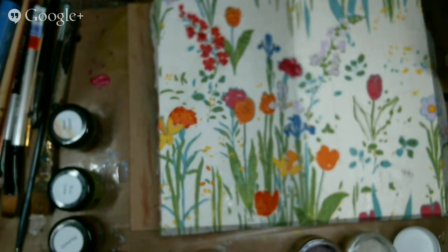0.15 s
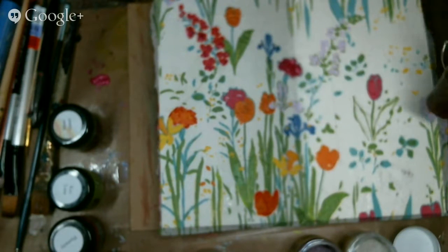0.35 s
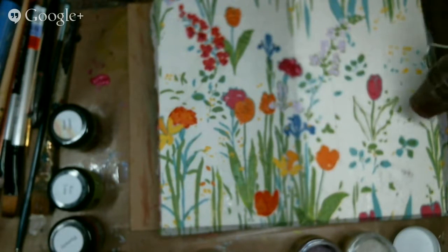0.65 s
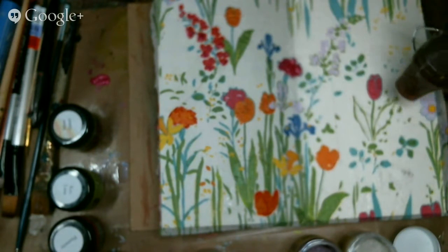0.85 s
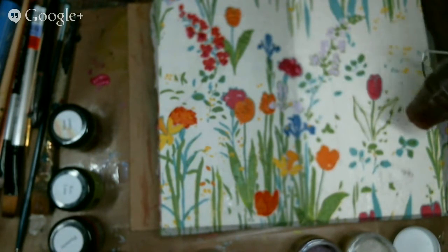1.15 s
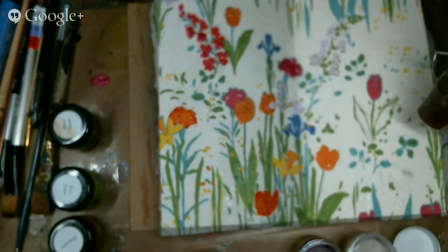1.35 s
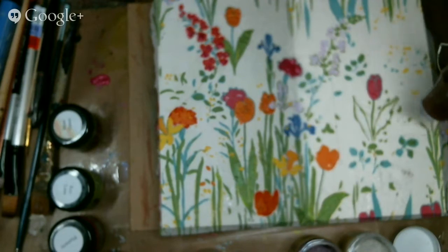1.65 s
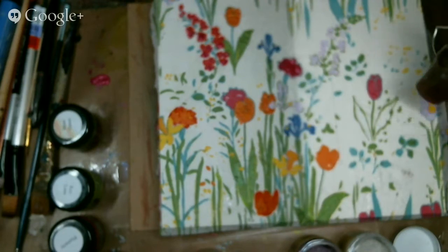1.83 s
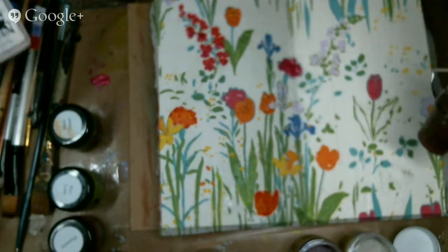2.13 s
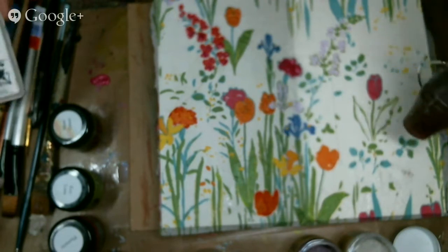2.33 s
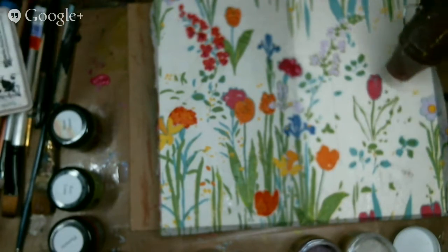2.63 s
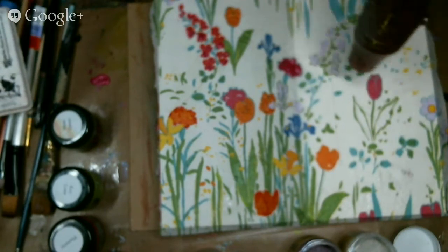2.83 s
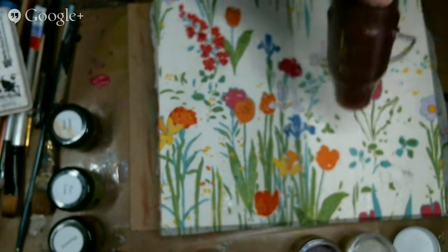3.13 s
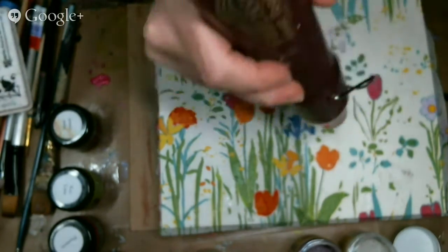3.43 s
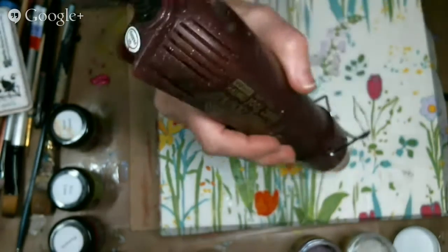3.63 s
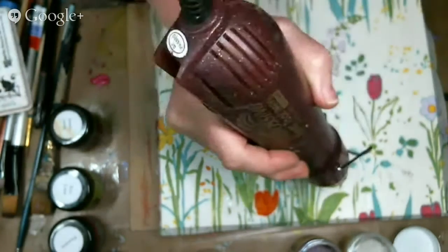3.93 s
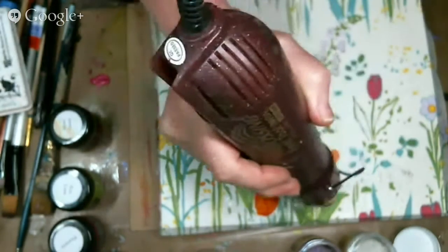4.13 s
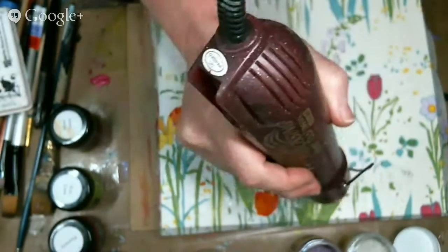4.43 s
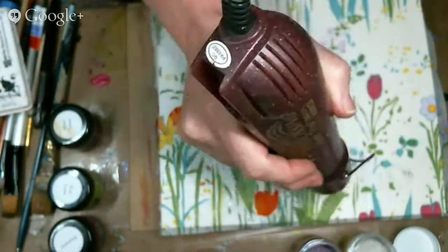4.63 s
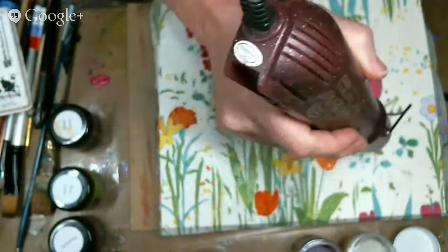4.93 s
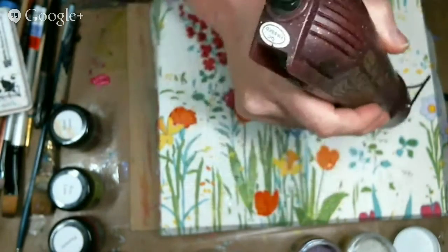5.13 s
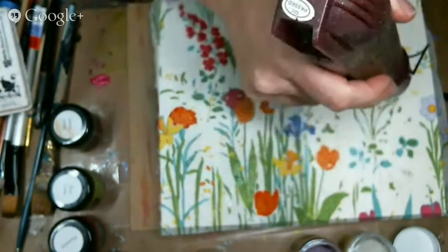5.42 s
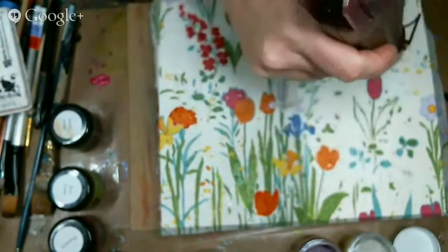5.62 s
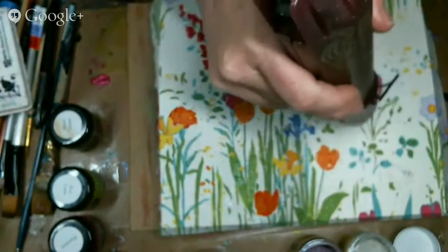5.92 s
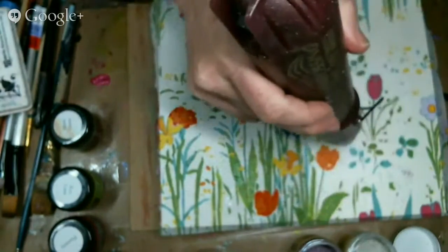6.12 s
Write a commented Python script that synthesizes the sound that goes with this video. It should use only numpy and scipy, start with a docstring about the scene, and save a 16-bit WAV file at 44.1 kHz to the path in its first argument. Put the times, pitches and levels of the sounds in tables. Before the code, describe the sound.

Electric blower motor starts with a rushing whine, drops away in steps, bubbles faintly, then one hard plastic clack on a desk.

```python
"""At a desk, near a webcam, a handheld hot-air tool starts up and is turned.
The motor is a stack of sines at shaft orders 6 to 26 plus a blade tone at order 5; the air is shaped noise.
After a second the rush sinks band by band; low blips, short soft-edged sines, bubble through what is left.
A plastic box is set down with one knock: several close contacts, each of decaying modes and noise bursts."""
import sys
import numpy as np
from scipy import signal
from scipy.fft import rfft, irfft, next_fast_len
from scipy.io import wavfile
from scipy.ndimage import uniform_filter1d, map_coordinates

SR = 44100
rng = np.random.default_rng(int(sys.argv[2]) if len(sys.argv) > 2 else 0)


def output_pcm(signal):
    """Save a mono or channel-first signal as 16-bit PCM at the path in sys.argv[1].

    Samples are clipped to [-1, 1] before scaling.
    """
    pcm = np.clip(np.atleast_2d(signal).T, -1, 1) * 32767
    wavfile.write(sys.argv[1], SR, np.round(pcm).astype(np.int16))


N = 276507

# mean level of the five-blade fan tone, before flares: (time [s], rms level [dB])
BLADE_LEVELS = [(.06, -54), (.13, -48.5), (.22, -41.5), (.5, -41), (.94, -38.5), (1.01, -47.5), (1.4, -51),
                (1.55, -57), (2.14, -67.5), (2.2, -53.5), (2.45, -59.5), (3.5, -57), (3.62, -44),
                (3.76, -31), (3.86, -43.5), (4.1, -50.5), (4.7, -53), (5.6, -51), (6.27, -50.5)]
# brief flares of the blade tone: (time [s], rise [dB], half-length to 1/e [s])
BLADE_FLARES = [(0.352, 7.5, 0.051), (2.906, 20, 0.0234), (2.986, 17.5, 0.0112), (3.058, 22, 0.0075),
                (3.668, 5, 0.029), (3.913, 6, 0.0317), (3.993, 13.5, 0.0107), (4.438, 8, 0.0236),
                (5.916, 3, .08)]
# turn of the air inlet towards the microphone: (time [s], share [0-1])
TURN_SHARES = [(2.7, 0), (3.3, 0.77), (3.7, 1)]
# relative colour of the air, tool seen from the side: (frequency [Hz], density [dB])
SIDE_COLOUR = [(40, -13.5), (85, -24.5), (150, -28.5), (500, -17), (750, -3), (1000, -9), (1600, -6.5),
               (2600, -10.5), (3300, -7.5), (3700, -2.5), (4000, 4), (4400, -8.5), (6100, -17), (7000, -28),
               (8100, -60.5)]
# relative colour of the air, tool seen from behind: (frequency [Hz], density [dB])
END_COLOUR = [(40, -9.5), (85, -26), (150, -18), (480, -28), (680, -12), (950, -13), (1400, -5.5),
              (1800, 0), (2250, -5), (2550, 4.5), (3000, -8.5), (4600, -7), (5500, -10.5), (6800, -17),
              (8000, -45)]
# air resonances of the housing: (frequency [Hz], width [Hz], height above the colour [dB])
HOUSING_MODES = [(277, 84, 9), (478.3, 50, 15.5), (658.6, 34.65, 17.5), (756.8, 61.3, 11)]
# shaft orders from 6 up, mean level over the rush per Hz: (side on [dB], from behind [dB])
ORDER_LEVELS = [(13, 12), (17, 13), (19, 22), (13, 18), (23, 24), (15, 18), (17, 21), (17, 24), (15, 16),
                (17, 19), (22, 18), (25, 28), (24, 15), (15, 21), (24, 25), (25, 31), (20, 23), (22, 23),
                (23, 14), (22, 22), (20, 18)]
# single orders sing out or fall away: (order [-], time [s], change [dB], half-length to 1/e [s])
ORDER_CHANGES = [(7, 3.1, 10, .45), (11, 2.9, 6, .7), (18, 2.8, 4, .2), (25, 3.1, 4, .4), (26, 2.8, 5, .5),
                 (8, 6.05, 12, .55), (17, 5.3, -3, .5), (13, 6.1, 5, .4), (21, .4, 5, .25),
                 (16, .45, 5, .25), (17, 4.5, 3, .4), (8, .4, 4, .3), (21, 1.5, -4, .4), (23, 1.4, -8, .4),
                 (25, 1.4, -8, .4), (17, 3.1, -9, .6), (10, 3.1, -5, .6), (20, .8, -7, .5)]
# shortfall of shaft speed at switch-on: (shortfall [turns/s], time constant [s])
SPIN_UP_GAPS = [(159.9, .109), (28.3, .365)]
# parts of the rush: name: (lower edge [Hz], upper edge [Hz])
RUSH_BANDS = {"rumble": (20, 150), "hollow": (200, 560), "duct": (600, 900), "rush": (1450, 2700),
              "edge": (2800, 3400), "nozzle": (3500, 4400), "hiss": (4400, 5900), "top": (6100, 7500)}
# course of each part: name: (full level [dB], missing at switch-on [dB], rise time constant [s],
# change with the turn [dB], sinking [dB/s], share of the swells [-])
RUSH_PARTS = {"rumble": (-54.5, 17, .18, -3, 3, 1.1), "hollow": (-41.5, 20.5, 0.1785, -2, 2.5, 1.54),
              "duct": (-34, 16.5, 0.067, -0.5, 2.32, 1.2077), "rush": (-39, 15, 0.0019, 1, .5, 0.806),
              "edge": (-51.5, 16, .08, -1, 0.91, 0.79), "nozzle": (-46, 20, .08, -4, 0.68, 0.66),
              "hiss": (-33.5, 15, 0.1658, 2, 0.4251, 0.97), "top": (-41.5, 12, 0.43, 2, 1.39, 0.95)}
# lasting steps in a part: (start [s], part [name], change [dB], duration [s])
RUSH_STEPS = [(.05, "edge", 14, .03), (.05, "nozzle", 10, .03), (5.6, "duct", 4, .5),
              (0.188, "nozzle", 6, 0.12), (.04, "rush", 5, 0.069), (3.6, "duct", -2.5, .05),
              (5.8, "rumble", 5.5, .3), (0.946, "rush", -7.5, 0.024), (0.962, "edge", -11, 0.025),
              (1.017, "edge", 7, 0.084), (0.93, "nozzle", -3, .04), (0.969, "hollow", -8.5, 0.38),
              (0.966, "duct", -16.5, 0.598), (1.17, "rush", -6.5, .015), (1.17, "nozzle", -12, .015),
              (1.17, "hiss", -7, .015), (1.203, "rumble", -12.5, .3), (1.265, "hiss", -10.5, .02),
              (1.375, "rush", -5.5, 0.072), (1.393, "edge", -12.5, 0.0727), (1.36, "nozzle", -4.5, 0.047),
              (1.383, "hiss", -3.5, 0.074), (1.5, "hollow", -13, 0.78), (2.5, "rush", 4.5, 0.039),
              (0.966, "top", -9.5, 0.12), (1.17, "top", -6, .015), (1.274, "top", -7.5, 0.1)]
# swells of the whole rush, before each part's share: (peak time [s], rise [dB], attack [s], decay [s])
RUSH_SWELLS = [(1.16, 3, .03, .012), (2.482, 5, 0.0188, 0.24), (3.772, 5, 0.069, 0.578)]
# contacts of box and desk: (time [s], nominal level, 2 dB taken off when struck [dB])
CONTACTS = [(2.4517, -4), (2.4622, -15), (2.467, -16.5), (2.477, -21), (2.506, -30.5), (2.615, -30)]
# modes of the box: (frequency [Hz], mean level [dB], t60 [s])
BOX_MODES = [(788, -16, 0.059), (973.3, -1, 0.045), (1116.6, -5.5, 0.042), (1179, -1, 0.033),
             (2200, -8, 0.028), (2603, -10.5, 0.0354), (3130, -22.5, 0.02)]
# loudest low blips: (time, 8 ms after onset [s], nominal peak, 1 dB added when sounded [dB], pitch [Hz])
LOUD_BLIPS = [(1.307, -37.5, 488.3), (1.381, -33, 484.2), (1.474, -37.5, 715), (1.481, -41, 515.4),
              (1.617, -46, 287.3), (1.635, -36.5, 495), (1.687, -35.5, 516.6), (1.713, -40, 712.7),
              (1.805, -42.5, 527), (1.891, -44.5, 509.5), (1.961, -49, 278.4), (2.062, -43.5, 671.7),
              (2.145, -34.5, 485.6), (2.164, -42, 695.7), (2.344, -43, 463.7), (2.477, -35.5, 474.3),
              (2.563, -47, 257.4), (2.62, -46.5, 261.2), (2.696, -36, 485.5), (2.757, -42, 688.6),
              (2.956, -37, 652.6), (3.046, -36, 661), (3.579, -43, 276), (3.774, -42, 298),
              (4.164, -45, 478), (4.172, -37, 661.7), (4.337, -41.5, 675), (4.402, -48.5, 263.7),
              (4.881, -48, 277), (4.957, -40.5, 741.4), (5.512, -52, 648), (4.982, -51.5, 501),
              (5.51, -53.5, 474), (3.729, -49, 717.3), (5.437, -50, 685), (4.621, -54, 263.5),
              (4.682, -50.5, 474.3), (5.92, -55, 264.2), (6.142, -56.5, 276), (6.195, -53, 483)]

HOT_TURNS_PER_S, COLD_EXTRA_TURNS_PER_S, WARM_S = 260.62, 25.9, 1.73
# fainter blips by chance, levels nominal as above
FAINT_COUNT, FAINT_FROM_S = 36, 1.3
FAINT_DB, FAINT_SINK_DB_PER_S, FAINT_SCATTER_DB = -49, 1.8, 3
TOP_HZ = 8010


def tool():
    """Sum of air noise, shaft orders, housing throb and blade tone."""
    now_s = np.arange(N) / SR
    air, level_db, hz, frame_s = air_rush()
    # the shaft runs a little unevenly
    phase = 2 * np.pi * np.cumsum(shaft_turns_per_s(now_s)) / SR + 0.025 * wobble(25)
    once_a_turn = 0.15 * np.cos(phase)
    twice_a_mains_cycle = 0.1 * np.cos(2 * np.pi * 120 * now_s)
    air *= 1 + once_a_turn + twice_a_mains_cycle
    whine = shaft_whine(phase, level_db, hz, frame_s, now_s)
    return air + whine + housing_throb(now_s) + blade_tone(phase, now_s)


def shaft_turns_per_s(t):
    """Shaft speed: spins up, then sags as the motor warms."""
    cold = COLD_EXTRA_TURNS_PER_S * np.exp(-t / WARM_S)
    shortfall = sum(gap * np.exp(-t / tau_s) for gap, tau_s in SPIN_UP_GAPS)
    return HOT_TURNS_PER_S + cold - shortfall


def shaft_whine(phase, level_db, hz, frame_s, now_s):
    """Tones at whole multiples of shaft speed, riding on the local rush level."""
    settled_db = np.interp(now_s, [0.12, 0.28], [-14, 0])  # orders emerge as the motor comes up to speed
    late_turn = turned(frame_s) ** 4  # orders change late in the turn
    whine = np.zeros(N)
    for order, (side_db, end_db) in enumerate(ORDER_LEVELS, start=6):
        bins = order * shaft_turns_per_s(frame_s) / hz[1]
        rush = map_coordinates(level_db, [bins, np.arange(len(frame_s))], order=1)
        view_db = side_db + late_turn * (end_db - side_db)
        changes_db = sum(db * bump(frame_s, s, half_s) for k, s, db, half_s in ORDER_CHANGES if k == order)
        order_db = np.interp(now_s, frame_s, rush + view_db + changes_db) + settled_db
        unsteady_db = wobble(4) + 2.5 * wobble(20)
        tone = np.sin(order * phase + rng.uniform(0, 7))
        whine += np.sqrt(2) * amp(order_db + unsteady_db) * tone
    return whine


def blade_tone(phase, now_s):
    """Five blades a turn give order 5; eddies spread a noisy skirt round the tone."""
    blade = 5 * phase
    skirt = 0.2 * (wobble(300) * np.sin(blade) + wobble(300) * np.cos(blade))
    flare_db = sum(db * bump(now_s, s, half_s) for s, db, half_s in BLADE_FLARES)
    level_db = curve(BLADE_LEVELS, now_s) + flare_db + 1.5 * wobble(45)
    return np.sqrt(2) * amp(level_db) * (np.sin(blade) + skirt)


def air_rush():
    """Rushing air: white noise shaped in short frames, with patchy random levels over pitch and time."""
    hz, frame_s, z = signal.stft(rng.standard_normal(N), SR, nperseg=1024, noverlap=768)
    level_db = rush_db(hz, frame_s)
    flicker_depth_db = along([(100, 1.7), (500, 0.92), (800, 1.6), (1200, 2.34), (3000, 1.3)], hz)
    lull_depth_db = along([(100, 2), (560, 3), (900, 2.5), (1300, -0.5)], hz)
    swell_db = 1.138 * patches(z.shape, bins=40, frames=12)  # ties neighbouring pitches together
    lull_db = lull_depth_db[:, None] * patches(z.shape, bins=14, frames=14)  # the bass drops out at times
    flicker_db = flicker_depth_db[:, None] * patches(z.shape, bins=5, frames=6)
    gain = amp(level_db + swell_db + lull_db + flicker_db) * np.sqrt(SR / 2)  # from per-Hz level
    air = signal.istft(z * gain, SR, nperseg=1024, noverlap=768)[1][:N]
    return air, level_db, hz, frame_s


def rush_db(hz, t):
    """Air level per Hz, frequency by time: colour follows the turn, each part is set to its own level."""
    turn = turned(t)
    peaks = sum(db / (1 + (2 * (hz - mode_hz) / width_hz) ** 2) for mode_hz, width_hz, db in HOUSING_MODES)
    side, end = along(SIDE_COLOUR, hz)[:, None], along(END_COLOUR, hz)[:, None]
    colour = (1 - turn) * side + turn * end + peaks[:, None]
    power = [np.sum(amp(2 * colour[(hz >= lo) & (hz < hi)]), 0) * hz[1] for lo, hi in RUSH_BANDS.values()]
    lift_db = np.array([part_db(name, t) for name in RUSH_BANDS]) - 10 * np.log10(power)
    # lift is constant inside a part and glides between parts
    edges_hz = np.ravel(list(RUSH_BANDS.values()))
    place = np.interp(hz, edges_hz, np.arange(2 * len(RUSH_BANDS)) // 2)
    low = np.minimum(place.astype(int), len(RUSH_BANDS) - 2)
    share = (place - low)[:, None]
    return colour + (1 - share) * lift_db[low] + share * lift_db[low + 1]


def part_db(name, t):
    """Level of one part of the rush: rise, steps, turn, slow sinking and swells."""
    full_db, missing_db, rise_s, turn_db, sink_db_per_s, share = RUSH_PARTS[name]
    start_db = -missing_db * np.exp(-t / rise_s)
    steps_db = sum(db * np.clip((t - s) / length_s, 0, 1)
                   for s, part, db, length_s in RUSH_STEPS if part == name)
    swell_db = sum(db * np.where(t < s, bump(t, s, up_s), np.exp(-np.abs(t - s) / down_s))
                   for s, db, up_s, down_s in RUSH_SWELLS)
    sunk_db = sink_db_per_s * np.maximum(t - TURN_SHARES[0][0], 0)  # from the start of the turn
    return full_db + start_db + steps_db + turn_db * turned(t) - sunk_db + share * swell_db


def turned(t):
    """Share of the turn completed."""
    return curve(TURN_SHARES, t)


def housing_throb(now_s):
    """The housing shakes below the pitch of the air: narrow noise following the rumble level."""
    throb = passed(rng.standard_normal(N), 27, 36)
    return amp(part_db("rumble", now_s) - 3) * throb / throb.std()


def box():
    """Each contact rings the box modes at new strengths, with clack, crack and desk thud; a short room tail."""
    out, t = np.zeros(N + SR), np.arange(SR // 4) / SR
    for s, db in CONTACTS:
        ring = sum(decay(level_db + rng.normal(0, 1.5), t60_s, t) * np.sin(2 * np.pi * hz * t)
                   for hz, level_db, t60_s in BOX_MODES)
        clack = decay(-4, 0.0808, t) * passed(rng.standard_normal(len(t)), 2100, 3547)
        crack = decay(-8.5, 0.05, t) * passed(rng.standard_normal(len(t)), 5200, 7300)
        thud = decay(-6, 0.17, t) * passed(rng.standard_normal(len(t)), 70, 560)
        thud *= 1 - np.exp(-t / 0.0214)
        onset = 1 - np.exp(-t / 0.0015)
        out[round(s * SR):][:len(t)] += amp(db - 2) * onset * (ring + clack + crack + thud)
    tail = rng.standard_normal(len(t)) * decay(0, 0.045, t)
    tail /= np.linalg.norm(tail)
    wet = out[:N] + amp(-14) * signal.fftconvolve(out, tail)[:N]
    # the microphone is deaf to the top of the crack
    return passed(passed(wet, 40, 6600), 40, 6600)


def blips():
    """Short sines under a squared-sine envelope, each with a random length and phase bend."""
    out = np.zeros(N + SR)
    for s, db, hz in [*LOUD_BLIPS, *faint_blips()]:
        length_s = 0.03925 * np.exp(rng.normal(0, 0.291))
        t = np.arange(int(length_s * SR)) / SR
        arch = np.sin(np.pi * t / t[-1])
        bend = rng.normal(0, 2) * arch
        out[round((s - 0.008) * SR):][:len(t)] += amp(db + 1) * arch ** 2 * np.sin(2 * np.pi * hz * t + bend)
    return out[:N]


def faint_blips():
    """Chance faint low blips at three set pitches, sinking in level with time."""
    luck_time, luck_pitch, luck_level = rng.random((FAINT_COUNT, 3)).T
    late_s = luck_time * (N / SR - FAINT_FROM_S)
    set_hz = np.array([277, 478.3, 658.6])
    pitch_hz = set_hz[(3 * luck_pitch ** 2).astype(int)]  # mostly the lowest
    level_db = FAINT_DB - FAINT_SINK_DB_PER_S * late_s + FAINT_SCATTER_DB * (2 * luck_level - 1)
    return zip(FAINT_FROM_S + late_s, level_db, pitch_hz)


def amp(db):
    """Gain of a level in dB."""
    return 10 ** (np.asarray(db) / 20)


def decay(start_db, t60_s, t):
    """Exponential decay, 60 dB down after t60_s."""
    return amp(start_db - 60 * t / t60_s)


def along(points, hz):
    """(frequency [Hz], value) points read on a log axis."""
    f, v = np.transpose(points)
    return np.interp(np.log(hz + 1), np.log(f + 1), v)


def curve(points, t):
    """(time [s], value) points read at the times t."""
    s, v = np.transpose(points)
    return np.interp(t, s, v)


def bump(t, s, half_s):
    """Gaussian hump of height 1 at s."""
    return np.exp(-((t - s) / half_s) ** 2)


def wobble(knots_per_s):
    """Smooth random curve through normal knots."""
    knots = rng.standard_normal(int(N * knots_per_s / SR) + 4)
    return map_coordinates(knots, [np.arange(N) * knots_per_s / SR])


def patches(shape, bins, frames):
    """Random field of standard deviation 1, smooth over some bins and frames."""
    field = uniform_filter1d(rng.standard_normal(shape), bins, 0)
    field = uniform_filter1d(field, frames, 1)
    return field / field.std()


def passed(x, lo_hz, hi_hz):
    """Causal Butterworth band-pass."""
    return signal.sosfilt(signal.butter(4, [lo_hz, hi_hz], "band", fs=SR, output="sos"), x)


def scene():
    """One microphone feeds both channels."""
    return np.tile(tool() + blips() + box(), (2, 1))


def record(dry):
    """Cuts the scene off at the band limit and adds a faint converter hiss."""
    m = next_fast_len(N + SR // 4)
    hz = np.fft.rfftfreq(m, 1 / SR)
    hiss_db = along([(8000, -92), (10000, -92), (12000, -88), (14400, -91), (14600, -98), (16000, -103)], hz)
    hiss = rfft(rng.standard_normal(N), m) * amp(hiss_db)
    return irfft(rfft(dry, m) * (hz < TOP_HZ) + hiss, m)[:, :N]


dry = scene()
out = record(dry)
output_pcm(out)
```